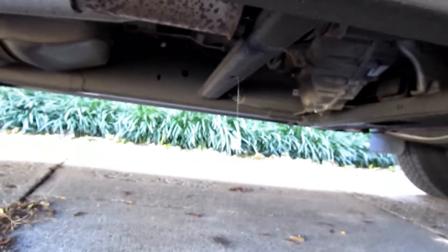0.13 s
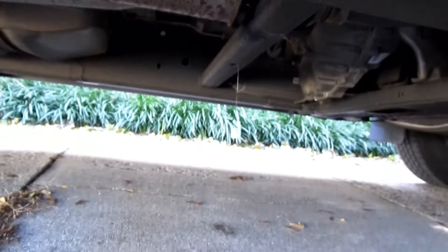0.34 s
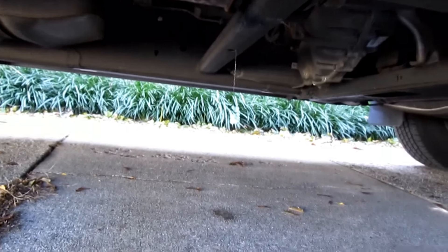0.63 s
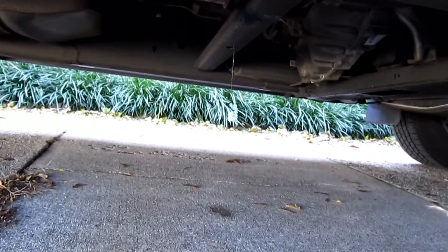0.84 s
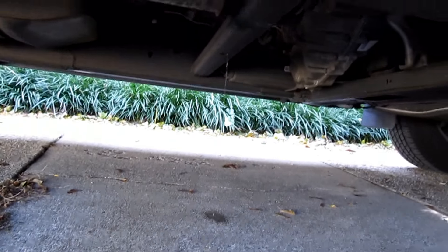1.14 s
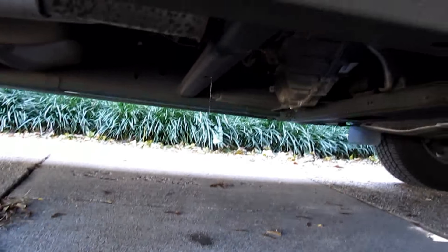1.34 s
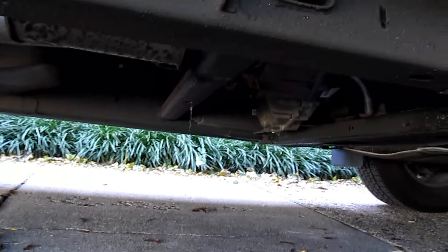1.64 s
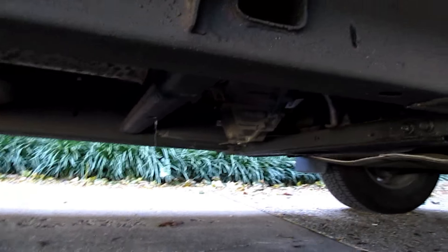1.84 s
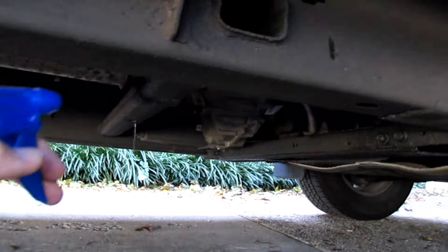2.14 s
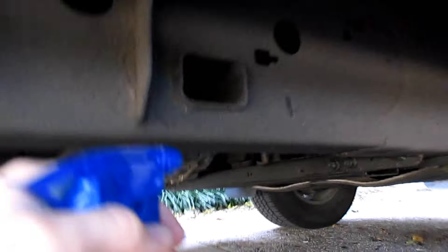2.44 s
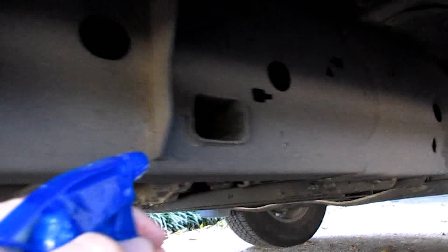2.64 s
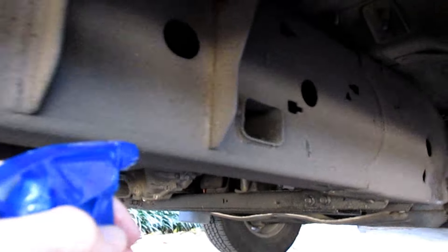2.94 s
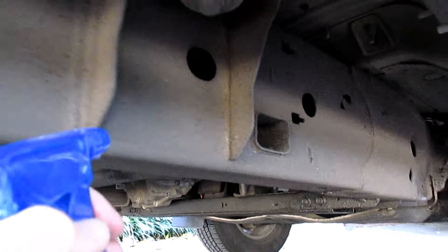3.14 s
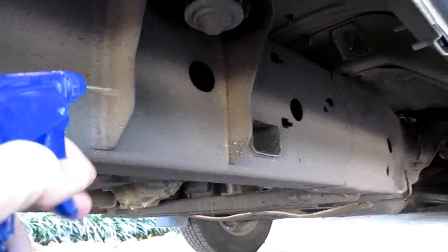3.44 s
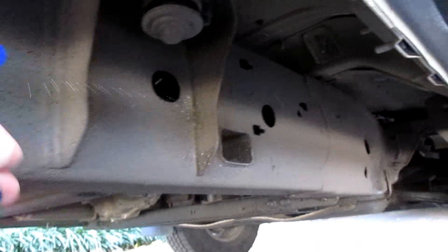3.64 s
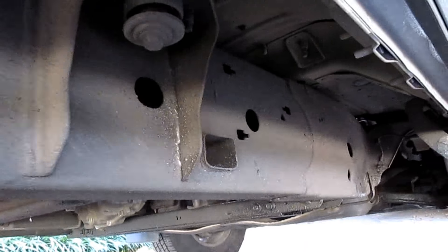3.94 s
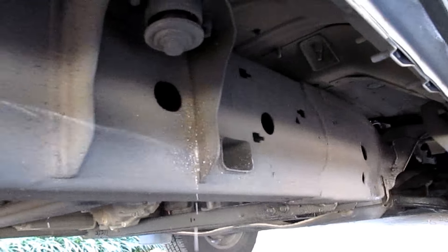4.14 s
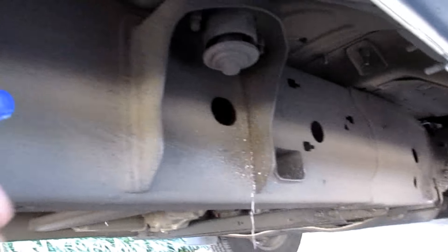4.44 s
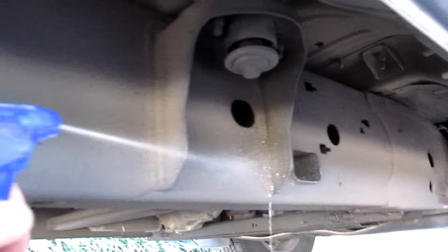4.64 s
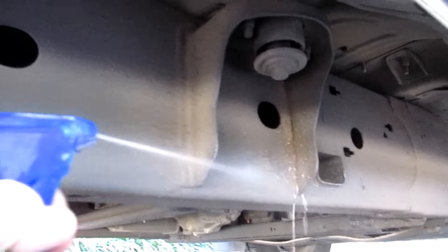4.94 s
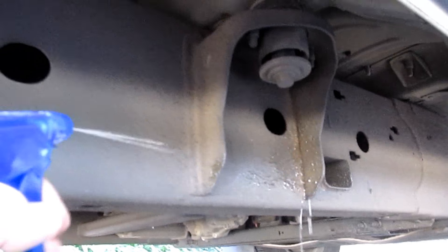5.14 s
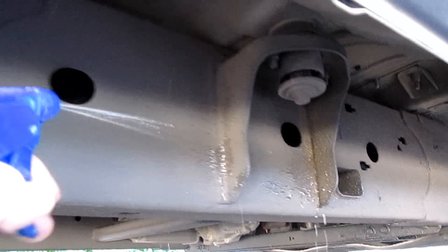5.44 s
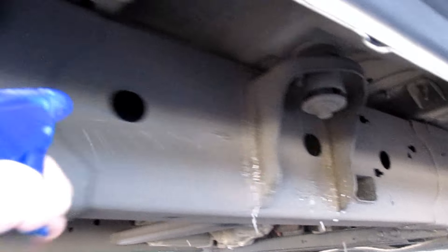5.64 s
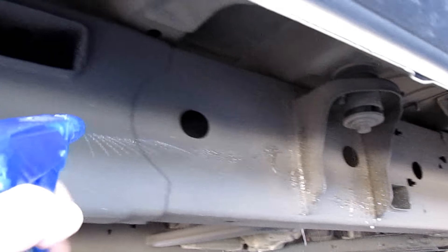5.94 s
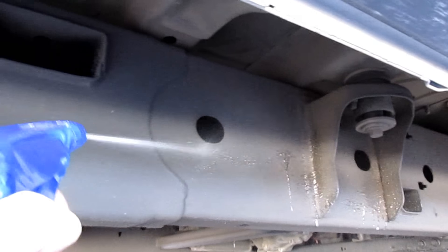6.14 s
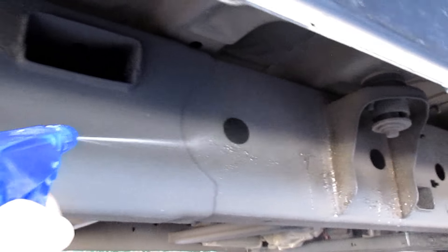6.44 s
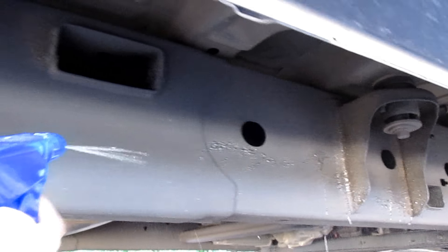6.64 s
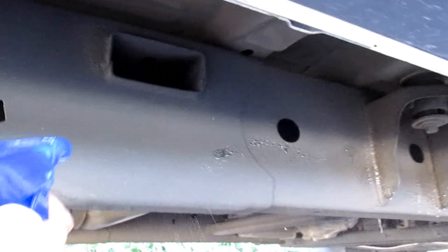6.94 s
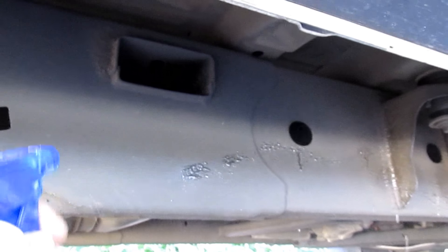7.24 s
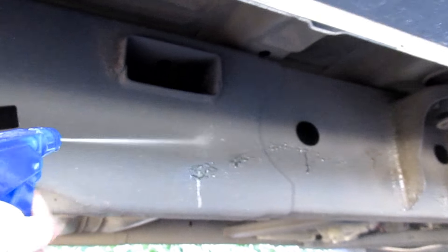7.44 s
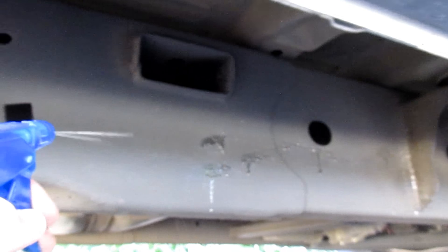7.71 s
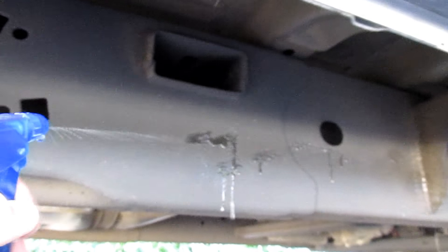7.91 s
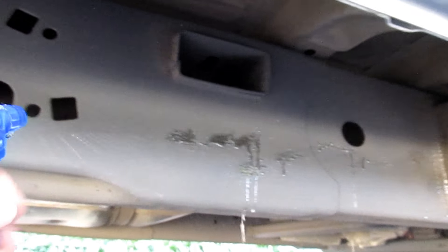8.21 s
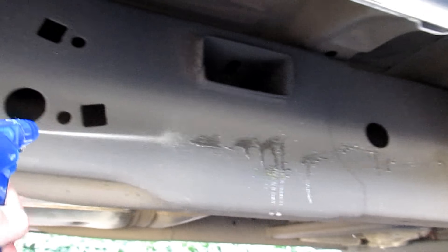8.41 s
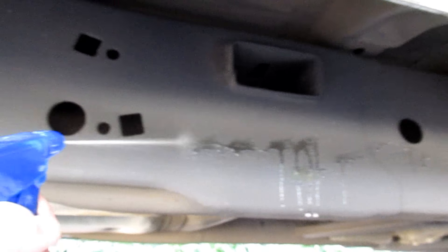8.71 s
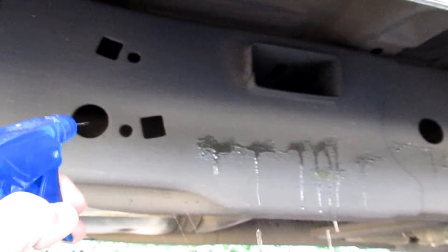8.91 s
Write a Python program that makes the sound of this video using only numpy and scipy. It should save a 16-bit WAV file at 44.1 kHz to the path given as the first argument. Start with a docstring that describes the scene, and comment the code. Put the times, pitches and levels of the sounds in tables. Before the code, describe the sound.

Beneath a parked vehicle, bumps and scrapes give way to quick, clicking trigger-spray squirts, each a short bright hiss with a chattering lever return.

```python
"""Outdoor air and a far engine hum lie under a person shuffling on concrete by a parked vehicle.
First cloth and grit scrape, the gripped bottle squeaks, and knocks ring through the camera body.
From 3.2 s a trigger sprayer is pumped: each squeeze clicks, creaks, spits and jets filtered noise
onto the steel frame; each return clicks and chatters in stick-slip pulses.
Late on, the splash also rings a hollow rail; a few more knocks come between the strokes."""
import sys
import numpy as np
from scipy import signal
from scipy.fft import rfft, irfft
from scipy.io import wavfile
from scipy.ndimage import uniform_filter1d

SR = 44100
rng = np.random.default_rng(int(sys.argv[2]) if len(sys.argv) > 2 else 0)


def volts_from_db(level):
    """Convert decibel levels to linear amplitude ratios."""
    exponent = np.asarray(level, float) / 20
    return 10 ** exponent


def file_out(sig):
    """Save sig as 16-bit WAV at sys.argv[1]."""
    # one column per channel
    cols = np.atleast_2d(sig).T
    # limit, then scale
    lim = np.clip(cols, -1, 1)
    pcm = np.round(lim * 32767).astype(np.int16)
    wavfile.write(sys.argv[1], SR, pcm)


N = 399987  # length [samples]

# All levels are relative: the functions below balance the layers.
# outdoor air: (time [s], level [dB])
AIR_LEVEL = [(0.0, -43), (2.35, -39), (2.55, -41), (3.76, -42), (4.75, -41), (5.61, -39.5), (9.07, -40.5)]
# likeness of left and right in the air: (frequency [Hz], likeness [-1 to 1])
AIR_LIKENESS = [(60, 0.97), (180, 0.89), (550, 0.74), (1650, 0.27), (4970, 0.016), (15000, 0.11)]
# lower and upper engine tone: (time [s], frequency [Hz], level [dB])
LOW_HUM = [(0, 96.1, -40), (.3, 97.6, -35.5), (1.4, 97.93, -27), (2.2, 98.2, -25), (2.5, 98, -39),
           (3.3, 96, -34.5), (3.8, 95, -35.5), (4.35, 97.3, -29), (4.5, 93.1, -35.5), (5.5, 95.57, -37),
           (6.3, 94.5, -36), (7, 93.4, -38), (7.4, 93.85, -37), (9.07, 93.3, -35)]
HIGH_HUM = [(0, 213, -48.5), (2.2, 209.6, -41), (3.6, 215.6, -62), (4, 211.1, -38.5), (4.7, 209.2, -48),
            (6, 204.9, -44), (9.07, 202.6, -54.5)]
# rubbing of the camera body, one table a bout: (time [s], thump level [dB], rasp over thump [dB])
RUBBING = [
    [(1.4, -61, -9), (1.46, -32.5, -6.5), (1.54, -31.5, 5), (1.6, -42, -2), (1.63, -25, 0), (1.68, -34, -7),
     (1.78, -32, -24), (1.79, -12.5, -16.5), (1.87, -32.5, -13), (1.96, -25, -17), (2.01, -42, -23)],
    [(2.31, -44.5, 2), (2.34, -14.5, -18), (2.71, -14.5, -7), (3.01, -25, -10.5), (3.03, -16.5, -14.5),
     (3.16, -21, -11.5), (3.34, -21.5, -15), (3.39, -39, 3), (3.7, -52, -9)],
    [(4.62, -57, -29), (4.644, -46.5, 15.5), (4.75, -54, -3)],
    [(5.24, -49.5, 2), (5.38, -29.5, -7), (5.55, -30, -10), (5.6, -18, -12.5), (5.67, -23, -7.5),
     (5.9, -33, -0.5), (6.064, -39.5, 6), (6.2, -38, 0.5), (6.45, -36, -2.5), (6.77, -27, -5),
     (6.868, -31.5, -1), (6.884, -11.5, -1), (6.93, -44, -16), (6.99, -53, 13)],
]
# dull bumps through the camera body: (time [s], level [dB], pitch [Hz])
BUMPS = [(1.792, -3.5, 292), (1.94, -17.5, 222), (2.341, -10, 207), (2.4, -10.5, 253), (2.46, -8.5, 195),
         (2.527, -26, 296), (2.588, -8, 228), (2.653, -12.5, 288), (2.698, -11, 290), (2.819, -7, 284),
         (2.922, -10, 278), (3.025, -8.5, 282), (3.107, -5, 166), (3.164, -19, 171), (3.26, -6.5, 167),
         (3.319, -5, 226), (5.595, -18, 267), (5.609, -12.5, 216), (5.691, -9, 226), (5.752, -14.5, 168),
         (5.85, -16, 180), (5.919, -26, 274), (6.42, -22.5, 201.5), (6.709, -24, 176), (6.779, -9.5, 302),
         (6.878, -8, 342), (6.915, -7.5, 185), (8.982, -29.5, 302)]
# hard taps: (time [s], level [dB], pitch [Hz], bite over tap [dB])
HARD_TAPS = [(1.444, -38, 504, -25), (1.5, -28, 900, -20), (1.533, -20, 606, -33), (1.617, -17, 1020, -17),
             (1.628, -8, 1120, -23), (1.796, -12.5, 540, -22), (2.341, -9.5, 610, -13),
             (2.426, -7.5, 606, -26), (2.456, -8, 573, -20), (2.49, -21, 509, -28),
             (2.612, -12.5, 597, -19), (2.547, -9, 620, -21), (2.656, -11.5, 695, -27), (3.271, -8, 510, 0),
             (4.635, -35, 820, -12), (4.666, -18, 1130, 0), (5.611, -23, 780, 16), (5.655, -8, 746, -2),
             (6.073, -14, 860, -8), (6.779, -15.5, 666, -18), (6.882, -4.5, 488, -19),
             (6.898, -7, 478, -24), (8.102, -31, 543, -13)]
# grit crunching under cloth: (time [s], level [dB], fall time [s])
GRIT_SCUFFS = [(1.055, -36, 0.1), (1.4416, -35.5, 0.63), (1.4905, -29.5, 0.49), (1.547, -31, 0.14),
               (1.6157, -23.5, 0.37), (1.6626, -58, 0.49), (1.7968, -27, 0.22), (1.858, -27.5, 0.25),
               (1.943, -35, 0.24), (2.1194, -48, 0.36), (2.1824, -41, 0.44), (2.2463, -31.5, 0.22),
               (2.2662, -33, 0.62), (2.3286, -20, 0.32), (2.391, -52, 0.26), (2.421, -38, 0.22),
               (2.4515, -27, 0.17), (2.5132, -38, 0.45), (2.5426, -15, 0.17), (2.571, -33, 0.3),
               (2.638, -26.5, 0.7), (2.7157, -16, 0.45), (2.7833, -20, 0.42), (2.841, -36, 0.58),
               (2.8983, -28, 0.26), (2.9587, -49, 0.44), (3.033, -23, 0.45), (3.0694, -22.5, 0.17),
               (3.125, -47, 0.54), (3.2061, -48, 0.35)]
# squeaks of the gripped bottle: (time [s], level [dB], pitch [Hz])
BOTTLE_SQUEAKS = [(2.215, -53, 5500), (2.259, -51, 5420), (2.13, -52, 2220), (2.2, -50, 2220),
                  (2.26, -46, 2200), (2.32, -41, 5420), (2.416, -38, 4720), (2.454, -39, 4700),
                  (2.5, -56, 7500), (2.515, -48, 4720), (1.88, -46, 3550)]
# pitches at which the gripped plastic bottle rings: (frequency [Hz])
BOTTLE_PITCHES = [2180, 3340, 4940, 5370, 6260, 7240, 8300, 9150]
# the finger takes up the slack, trapped air spits: (time [s], delay of the spit [s], spit level [dB])
SLACK_AND_SPITS = [(3.238, 0.035, -26), (3.556, 0.022, -33.5), (3.819, 0.027, -35), (4.08, 0.022, -33.5),
                   (4.334, .036, -32), (4.636, 0.028, -40), (4.934, .045, -30), (5.217, 0.021, -37),
                   (5.532, .022, -37), (5.831, 0.023, -37), (6.13, 0.029, -40), (6.428, .03, -35),
                   (6.748, .016, -39), (7.101, 0.015, -41), (7.449, .036, -34.5), (7.779, 0.035, -39),
                   (8.1, .018, -37), (8.403, 0.037, -36.5), (8.72, .045, -31), (9.003, 0.029, -34)]
# the valve opens and the jet runs until the piston bottoms:
# (time [s], length [s], first level [dB], last level [dB], splash over jet [dB])
JET_STROKES = [(3.304, 0.11, -28, -31.5, -11.5), (3.602, 0.048, -30.5, -21, -21),
               (3.866, 0.077, -21, -23.5, -19), (4.117, 0.059, -24.6, -26.5, -16.5),
               (4.401, 0.077, -33, -35.5, -9.5), (4.673, 0.09, -34.5, -26.5, -15.5),
               (4.989, 0.064, -39, -30.5, -11), (5.262, 0.089, -29, -28, -18.6),
               (5.586, 0.099, -29.5, -36, -12.5), (5.88, 0.092, -37, -32.5, -10),
               (6.185, 0.091, -36, -29.5, -11.5), (6.478, 0.084, -33.4, -32.5, -11.5),
               (6.798, 0.093, -35, -34.5, -10.5), (7.141, 0.096, -41, -33, -10),
               (7.518, 0.098, -39.5, -36.5, -9), (7.839, 0.11, -35.5, -35, -9.5),
               (8.15, 0.09, -35.5, -34, -9), (8.46, 0.079, -35.5, -29, -12.5),
               (8.773, 0.059, -35, -30.5, -12.5), (9.055, 0.08, -34.5, -31, -9)]
# the lever springs back with evenly paced chatter that grows louder, then dies away:
# (time [s], length [s], first level [dB], last level [dB], slip rate [per s])
LEVER_RETURNS = [(3.449, 0.049, -41, -31.5, 360), (3.726, 0.044, -41, -28, 390),
                 (3.986, .04, -48, -24.5, 382), (4.226, 0.033, -33, -27, 360),
                 (4.521, 0.043, -33, -27, 404), (4.829, 0.06, -38, -33, 360),
                 (5.115, 0.046, -34, -26.5, 385), (5.403, 0.055, -37, -22.5, 420),
                 (5.72, 0.048, -39, -33, 280), (6.025, 0.058, -36.5, -29.5, 360),
                 (6.333, 0.045, -35, -26.5, 395), (6.611, 0.047, -41, -22, 336),
                 (6.934, 0.03, -57, -27, 366), (7.295, 0.044, -48, -24.5, 330),
                 (7.671, 0.045, -34, -30, 380), (7.992, 0.03, -44, -26.5, 303),
                 (8.291, 0.046, -56, -26, 320), (8.604, 0.038, -59, -29, 308),
                 (8.896, 0.049, -37, -34, 339)]
# trigger and valve clicks: (time [s], level [dB], lower body over click [dB])
LEVER_CLICKS = [(3.238, -33, 7), (3.267, -21, 3), (3.4485, -24, 1), (3.5566, -11.5, -11.5),
                (3.5935, -23, -31), (3.7284, -18, -24), (3.8203, -11, -8.5), (3.8712, -13.5, -13),
                (3.986, -13.5, -33), (4.08, -7.5, -15), (4.226, -18, -23), (4.335, -16, -28),
                (4.39, -7.5, -38), (4.5216, -19, -33), (4.636, -19.5, -8), (4.8299, -20, -23),
                (4.9362, -22.5, -9), (5.112, -23, -15), (5.217, -10, -15), (5.38, -22, -25),
                (5.4065, -11.5, -23), (5.962, -21, -10), (6.272, -14, -16), (7.245, -16, -8),
                (3.954, -15, -25), (4.168, -18, -18), (8.544, -19, -16), (5.5318, -25, -17),
                (5.7207, -16.5, -11), (5.831, -22, -18), (6.0243, -17, -18), (6.132, -18, -9.5),
                (6.328, -14, -24), (6.4282, -10.5, -8.5), (6.4418, -9.5, -17), (6.616, -17, -12),
                (6.749, -25, -27), (6.9333, -18, -22), (7.101, -26, -6.5), (7.2974, -15.5, -18),
                (7.4486, -30, -23), (7.671, -13, -15), (7.7791, -36, -11), (7.8032, -29, -9),
                (7.992, -19, -14), (8.101, -10.5, -13.5), (8.296, -15, -15), (8.403, -36, -11),
                (8.604, -17, -11), (8.7214, -24, -5), (8.897, -23, -6), (9.0026, -29, 3.5)]
# ringing of the hollow steel rail: (frequency [Hz], width [Hz], level [dB])
RAIL_RINGS = [(662, 13, -1.5), (850, 50, -10), (1130, 60, -8), (1650, 60, -9), (1880, 60, -9)]
# noise colours, each: (frequency [Hz], level [dB])
AIR_COLOUR = [(18, -29), (30, -14), (46, -5), (80, -3), (115, 0), (150, -7.5), (234, -14.5), (370, -23),
              (620, -23.5), (1350, -29), (3950, -46.5), (7000, -45.5), (10000, -52.5), (15600, -51)]
THUMP_COLOUR = [(20, 2), (38, -23), (55, -1), (91, -12.5), (161, 0), (252, -2.5), (286, 0.5), (350, -4.5),
                (460, -16), (600, -15), (1000, -50.5)]
RASP_COLOUR = [(260, -12), (450, -1), (608, -1.5), (744, -1), (900, -5.5), (1150, -6.5), (1410, -12),
               (2240, -23), (3250, -22), (5500, -120)]
BITE_COLOUR = [(800, -47), (1500, -28), (2200, -1), (3200, 10.5), (4500, -8), (7000, 10), (10000, -29)]
GRIT_COLOUR = [(900, -19), (1600, 0.5), (2400, -5), (3600, -2), (4300, -7), (6800, -1.5), (8000, -5),
               (10500, -8), (15600, -11.5)]
JET_COLOUR = [(2060, -31), (3500, -15), (4490, -13.5), (5740, -3.5), (6830, -3.5), (7650, -6),
              (12900, -4.5), (14200, -0.5), (15600, -4.5)]
SPLASH_COLOUR = [(450, -45), (800, 1.5), (1300, -2.5), (2000, -2.5), (3000, 2), (4500, -1), (6000, -11)]
PUMP_COLOUR = [(1760, -25.5), (3000, -13), (3420, -4.5), (3900, -18), (4670, -4.5), (6450, -1.5), (8800, 7),
               (9560, 3), (13100, 7), (15600, 0.5)]
LEVER_COLOUR = [(450, -60), (750, -14), (1100, -4), (2000, 0), (3800, -3), (5000, -25)]

# bands in which a coloured noise is levelled [Hz]
HISS_BAND, BODY_BAND, RASP_BAND = (4000, 15500), (1500, 3800), (500, 1600)


def evened(x):
    """Scales to rms 1."""
    return x / np.sqrt(np.mean(x ** 2) + 1e-20)


def read(points, hz):
    """Reads a spectrum on a log-frequency axis."""
    f, value = np.transpose(points)
    return np.interp(np.log(hz + 1), np.log(f + 1), value)


def column(tables, count, rest):
    """One column of several tables over time, with a resting value between them."""
    out = np.full(N, float(rest))
    for rows in tables:
        rows = np.array(rows)
        at = np.arange(round(rows[0, 0] * SR), min(round(rows[-1, 0] * SR), N))
        out[at] = np.interp(at / SR, rows[:, 0], rows[:, count])
    return out


def coloured(x, tone, band):
    """Causal minimum-phase filter with this spectrum; white input of rms 1 gives rms 1 in the band."""
    hz = abs(np.fft.fftfreq(8192, 1 / SR))
    log_gain = np.log(volts_from_db(np.maximum(read(tone, hz), -100)))
    phase = -signal.hilbert(log_gain).imag
    taps = np.fft.ifft(np.exp(log_gain + 1j * phase)).real[:4096]
    inside = (hz > band[0]) & (hz < band[1])
    taps /= np.sqrt(np.mean(np.exp(2 * log_gain) * inside))
    return signal.oaconvolve(x, taps.reshape((1,) * (x.ndim - 1) + (-1,)), axes=-1)[..., :N]


def resonate(x, hz, width):
    """A resonance that follows hz, for noise: shift down, smooth, shift back up."""
    turn = np.exp(2j * np.pi * np.cumsum(hz * np.ones(N)) / SR)
    r = np.exp(-np.pi * width / SR)
    smooth = signal.lfilter([1 - r], [1, -r], x / turn)
    return evened((turn * smooth).real)


def slips(per_s, jitter, spread_db):
    """Stick-slip: near regular pulses of uneven size."""
    wander = evened(uniform_filter1d(rng.standard_normal(N), 200))
    cycles = np.cumsum(per_s * np.maximum(1 + jitter * wander, .1)) / SR
    pulses = np.diff(np.floor(cycles), prepend=0)
    return pulses * volts_from_db(spread_db * rng.standard_normal(N)) * np.sqrt(SR / per_s)


def random_hits(per_s, spread_db):
    """Sparse impulses at random times, with a few much larger than the rest."""
    return volts_from_db(spread_db * np.minimum(rng.exponential(1, N), 4)) * (rng.random(N) < per_s / SR)


def grains(per_s, spread_db, ms, bed, same):
    """Random dying noise bursts over a steady bed; the ports share the bursts, partly the noise."""
    swell = signal.lfilter([1], [1, -np.exp(-1000 / SR / ms)], random_hits(per_s, spread_db))
    left, other = rng.standard_normal((2, N))
    same = np.clip(same, 0, 1)
    right = same * np.roll(left, 2) + np.sqrt(1 - same ** 2) * other
    return evened((bed + evened(swell)) * np.array([left, right]))


def patchy(x, depth_db, hz_wide, ms_long):
    """The colour of a hiss drifts: random patches of louder and softer bands."""
    z = signal.stft(x, nperseg=256, noverlap=192)[2]
    wide = max(int(hz_wide * 256 / SR), 1)  # bins
    long = max(int(ms_long * SR / 64000), 1)  # hops of 64 samples
    field = rng.standard_normal(z.shape[:0:-1]).T
    field = uniform_filter1d(uniform_filter1d(field, wide, 0), long, 1)
    gain = volts_from_db(depth_db * evened(field))
    return signal.istft(z * evened(gain), nperseg=256, noverlap=192)[1][:, :N]


def bursts(s, db, t60, spike):
    """A spike and a dying puff of noise for each blow."""
    out, t = np.zeros(N), np.arange(4000) / SR
    for start, size, puff in zip(s, volts_from_db(db), rng.standard_normal((len(s), 4000))):
        part = out[round(start * SR):][:4000]
        part += (size * (puff * volts_from_db(-60 * t / t60) + spike * (t == 0)))[:len(part)]
    return out


def rings(s, db, hz, rise, t60):
    """A few cycles that swell and die for each blow."""
    out, t = np.zeros(N), np.arange(5000) / SR
    shape = (1 - np.exp(-(t / rise) ** 2)) * volts_from_db(-60 * t / t60)
    for start, size, f in zip(s, volts_from_db(db), hz):
        part = out[round(start * SR):][:5000]
        part += (size * shape / shape.max() * np.sin(2 * np.pi * f * t))[:len(part)]
    return out


def crackles(per_s, pitches, t60):
    """Sparse small slips that each ring briefly on one of the pitches."""
    size = random_hits(per_s, 2.2)
    kind, t = rng.integers(0, len(pitches), N), np.arange(3000) / SR
    out = np.zeros(N)
    for k, f in enumerate(pitches):
        ring = volts_from_db(-60 * t / t60) * np.sin(2 * np.pi * f * t)
        out += signal.oaconvolve(size * (kind == k), ring)[:N]
    return evened(out)


def strokes(s, length, first_db, last_db, rise, fall_db_per_s):
    """Each stroke rises, runs from its first to its last level, then dies away."""
    out, t = np.zeros(N), np.arange(12000) / SR
    for start, run, a_db, b_db in zip(s, length, first_db, last_db):
        level_db = a_db + (b_db - a_db) * np.minimum(t / run, 1) - fall_db_per_s * np.maximum(t - run, 0)
        part = out[round(start * SR):][:len(t)]
        part += (np.minimum(t / rise, 1) ** 2 * volts_from_db(level_db))[:len(part)]
    return out


def underbody(x, wet_db, t60):
    """Short echoes between concrete and floor pan, different at each port, drifting among four patterns."""
    t, out = np.arange(3000) / SR, np.zeros((2, N))
    turn = np.cumsum(rng.uniform(0, 60, N)) / SR  # place in the round of four patterns
    for k in range(4):
        tail = rng.standard_normal((2, 3000)) * volts_from_db(-60 * t / t60) * (t > .0001)
        tail *= volts_from_db(wet_db) / np.linalg.norm(tail[0])
        tail[0, 0], tail[1, 2] = 1, 1  # the sound reaches the left port first
        distance = np.clip((turn - k + 2) % 4 - 2, -1, 1)
        share = np.maximum(np.cos(np.pi / 2 * distance), 0)
        out += signal.oaconvolve((x * share)[None], tail / np.linalg.norm(tail[0]), axes=1)[:, :N]
    return out


def air():
    """Distant traffic and outdoor air: coloured noise, near mono in the bass."""
    hz = np.fft.rfftfreq(N, 1 / SR)
    same = np.clip(read(AIR_LIKENESS, hz), -1, 1)
    a, b = rfft(rng.standard_normal((2, N)))
    pair = irfft([a, same * a + np.sqrt(1 - same ** 2) * b], N)
    level_db = column([AIR_LEVEL], count=1, rest=AIR_LEVEL[-1][1])
    return volts_from_db(level_db) * coloured(pair, AIR_COLOUR, (110, 200))


def hum(rows, width, fuzz):
    """A far engine order: a tone with a wavering halo of narrow noise."""
    hz = column([rows], count=1, rest=rows[-1][1])
    tone = np.sqrt(2) * np.sin(2 * np.pi * np.cumsum(hz) / SR)
    halo = resonate(rng.standard_normal(N), hz, width)
    level_db = column([rows], count=2, rest=rows[-1][2])
    return volts_from_db(level_db) * evened(tone + fuzz * halo)


def rubbing():
    """Rubbing drives the camera body: a low thump and a rougher rasp of grainy noise."""
    thump_db = column(RUBBING, count=1, rest=-120)
    thump_noise = grains(120, 3.5, 3.6, 0.94, 0.99)
    thump = coloured(volts_from_db(thump_db - 0.5) * thump_noise, THUMP_COLOUR, (130, 450))
    rasp_db = thump_db + column(RUBBING, count=2, rest=0)
    rasp_noise = patchy(grains(110, 2.6, 5.0, 0.91, 0.88), 1, 350, 30)
    return thump + coloured(volts_from_db(rasp_db - 4.0) * rasp_noise, RASP_COLOUR, RASP_BAND)


def knocks():
    """Dull bumps ring low in the camera body; hard taps add a noisy bite and echo."""
    thuds = rings(*np.transpose(BUMPS), rise=0.0012, t60=0.069)
    s, db, hz, bite_db = np.transpose(HARD_TAPS)
    bite = coloured(bursts(s, db + bite_db - 11.5, 0.054, 5.8), BITE_COLOUR, (2000, 8000))
    taps = rings(s, db - 5.0, hz, rise=0.00066, t60=0.036)
    taps += coloured(bursts(s, db - 14.0, 0.15, 1.7), RASP_COLOUR, RASP_BAND)
    return thuds + underbody(taps + bite, -4.0, 0.099)


def grit_and_squeaks():
    """Grit crunches on concrete in grainy puffs; the gripped bottle slips and rings at its pitches."""
    s, db, t60 = np.transpose(GRIT_SCUFFS)
    grit_gain = strokes(s, t60, db - 13, db - 74.5, rise=0.0036, fall_db_per_s=300)
    grit = grit_gain * patchy(grains(170, 3.6, 5, .55, .35), 1.8, 1200, 30)
    ringing = crackles(70, BOTTLE_PITCHES, 0.074)
    squeaks = underbody(grit_gain * volts_from_db(-10.5) * ringing, 1.6, 0.0073)
    onsets = underbody(bursts(s, db - 12.5, 0.018, 5.9), -0.84, 0.0084)
    grit = coloured(grit + onsets, GRIT_COLOUR, (2500, 15000))
    clear_squeaks = rings(*np.transpose(BOTTLE_SQUEAKS), rise=0.0038, t60=0.099)
    return volts_from_db(2.5) * grit + squeaks + clear_squeaks


def spit_gain():
    """Trapped air spits from the nozzle: a brief bell-shaped puff after each take-up of the slack."""
    t, width_s = np.arange(N) / SR, 0.016
    grip, after, spit_db = np.transpose(SLACK_AND_SPITS)
    return sum(volts_from_db(db) * np.exp(-((t - at) / width_s) ** 2) for at, db in zip(grip + after, spit_db))


def jet_hiss(spits):
    """Liquid and air tear through the nozzle: bright grainy noise, nearly unlike at the two ports."""
    s, length, first_db, last_db, _ = np.transpose(JET_STROKES)
    flow = spits + strokes(s, length, first_db, last_db, rise=0.009, fall_db_per_s=445)
    return coloured(flow * patchy(grains(1300, 3.6, 0.77, 1.6, 0.025), 1.55, 1500, 25), JET_COLOUR, HISS_BAND)


def splash_and_rail(spits):
    """The jet strikes the steel frame: a duller splash, and later ringing of the hollow rail."""
    s, length, first_db, last_db, splash_db = np.transpose(JET_STROKES)
    gain = strokes(s, length, first_db + splash_db, last_db + splash_db, rise=0.013, fall_db_per_s=185)
    gain += volts_from_db(-18.5) * spits
    splash_noise = patchy(grains(900, 1.6, 0.92, 2.0, 0.6), 3.3, 400, 40)
    splash = coloured(gain * splash_noise, SPLASH_COLOUR, BODY_BAND)
    ring = sum(volts_from_db(db) * resonate(rng.standard_normal(N), hz, width) for hz, width, db in RAIL_RINGS)
    late = np.clip((np.arange(N) / SR - 6.6) / 0.39, 0, 1)  # the jet moves onto the hollow rail
    return splash, late * ring * uniform_filter1d(gain, 900)


def push_creak():
    """The piston creaks in stick-slip pulses through the slack and the squeeze."""
    grip, length = np.transpose(SLACK_AND_SPITS)[0], np.transpose(JET_STROKES)[1]
    level_db, slack_s = np.full(len(grip), -46.0), 0.028
    pushing = strokes(grip, slack_s + length, level_db, level_db, rise=0.0017, fall_db_per_s=445)
    return pushing * slips(192, .15, 4)


def lever_return():
    """The spring drives the lever back: stick-slip chatter and the hiss of suction."""
    s, length, first_db, last_db, per_s = np.transpose(LEVER_RETURNS)
    back = strokes(s, length, first_db, last_db, rise=0.0028, fall_db_per_s=884)
    slip_rate = per_s[np.maximum(np.searchsorted(s, np.arange(N) / SR) - 1, 0)]
    chatter = back * .86 * slips(slip_rate, .035, 2)
    suction_noise = patchy(grains(600, 2.5, 1.1, 1.1, .2), 2.5, 1500, 60)
    return chatter, coloured(back * .55 * suction_noise, PUMP_COLOUR, HISS_BAND)


def lever_clicks(chatter):
    """Lever and valve click: a bright click and a lower body that chatter also excites."""
    s, db, body_db = np.transpose(LEVER_CLICKS)
    clicks = coloured(bursts(s, db - 13.5, 0.043, 12.3), PUMP_COLOUR, HISS_BAND)
    body = bursts(s, db + body_db - 16.0, 0.049, 5.7) + volts_from_db(-18.0) * chatter
    body = coloured(body, LEVER_COLOUR, BODY_BAND)
    return underbody(clicks, 1.7, 0.0045), underbody(body, -0.22, 0.055)


def sprayer():
    """The pumped sprayer: jet, splash, creak both ways and clicks, the bright parts nearer the left."""
    spits = spit_gain()
    jet = jet_hiss(spits)
    splash, rail = splash_and_rail(spits)
    chatter, suction = lever_return()
    creak = underbody(coloured(push_creak() + chatter, PUMP_COLOUR, HISS_BAND), -1.5, .003)
    clicks, body = lever_clicks(chatter)
    near_left = volts_from_db([[1.6], [-1.6]])
    return volts_from_db(2.0) * (near_left * (jet + suction + creak + clicks) + splash + body) + rail


def scene():
    """All sources at the two microphone ports, the engine a little to the left."""
    engine = hum(LOW_HUM, width=3.46, fuzz=0.28) + hum(HIGH_HUM, width=6.6, fuzz=1.0)
    shuffle = rubbing() + knocks() + grit_and_squeaks()
    return air() + engine * volts_from_db([[.4], [-.4]]) + shuffle + sprayer()


def top_cut(x):
    """Nothing passes above the cut-off."""
    return signal.sosfilt(signal.butter(12, 16970, fs=SR, output="sos"), x)


def record(dry):
    """Bass cut, soft overload and a steep treble limit."""
    bass_cut = signal.butter(2, 30, "high", fs=SR, output="sos")
    treble_limit = signal.firwin(801, 15760, window=("kaiser", 5), fs=SR)
    mix = signal.sosfilt(bass_cut, dry)
    mix = 1.3 * np.tanh(mix / 1.3)
    mix = signal.oaconvolve(mix, treble_limit[None], "same")
    return top_cut(mix)


dry = scene()
out = record(dry)
file_out(out)
```